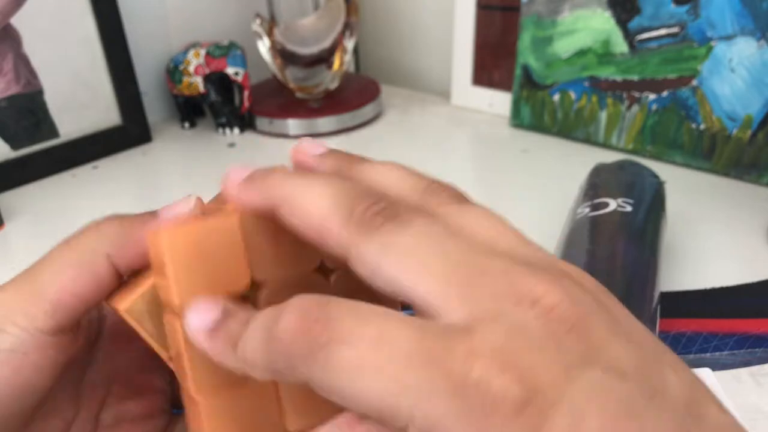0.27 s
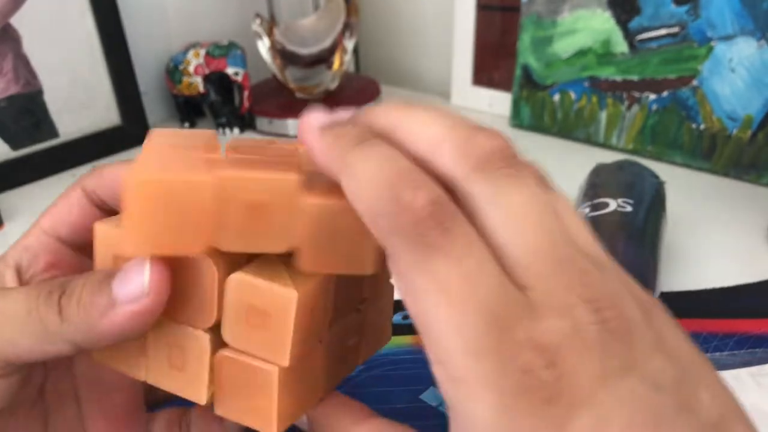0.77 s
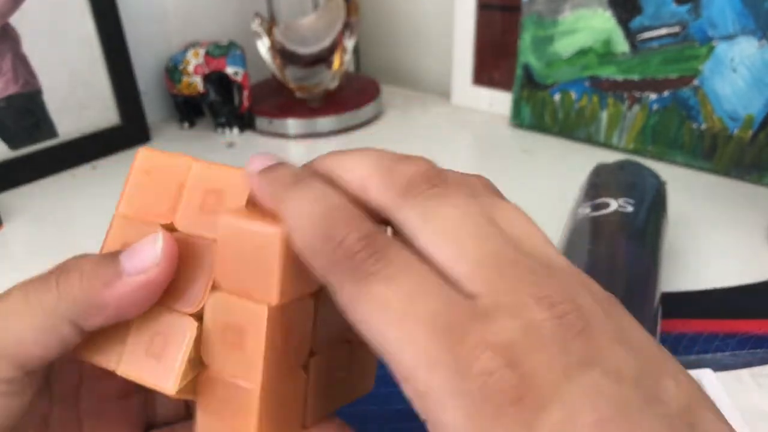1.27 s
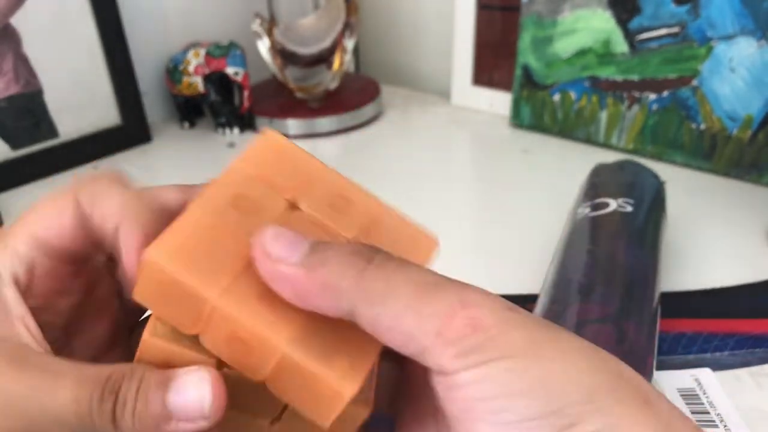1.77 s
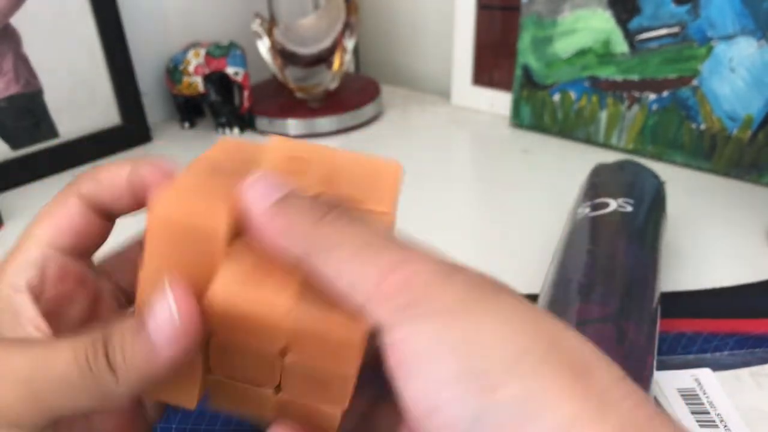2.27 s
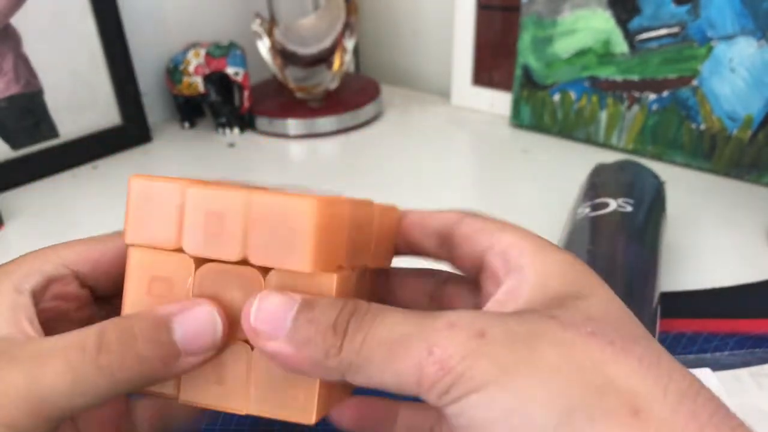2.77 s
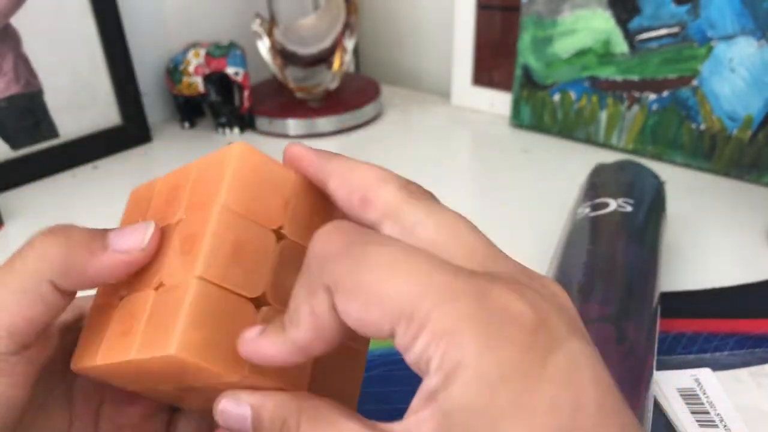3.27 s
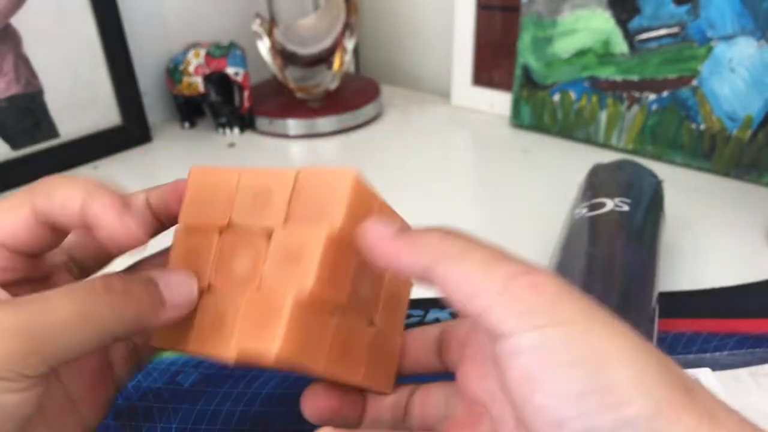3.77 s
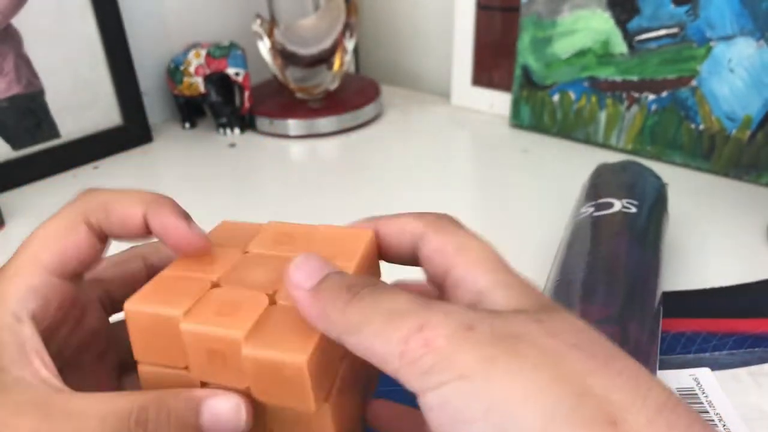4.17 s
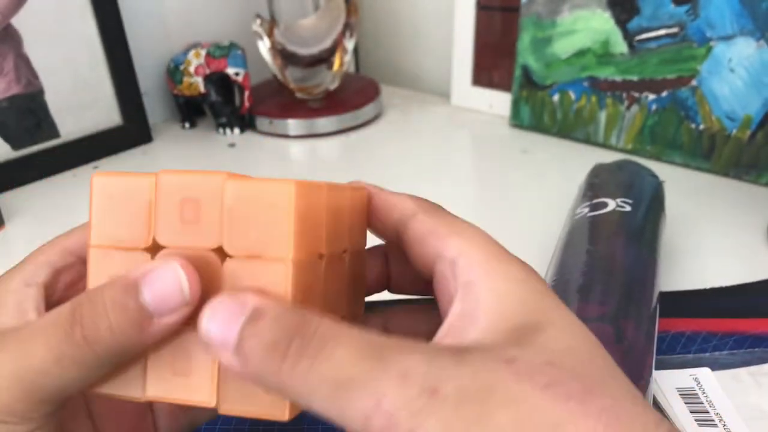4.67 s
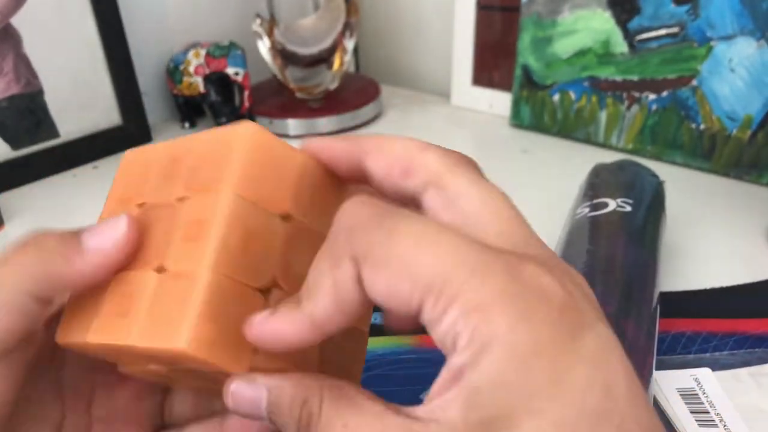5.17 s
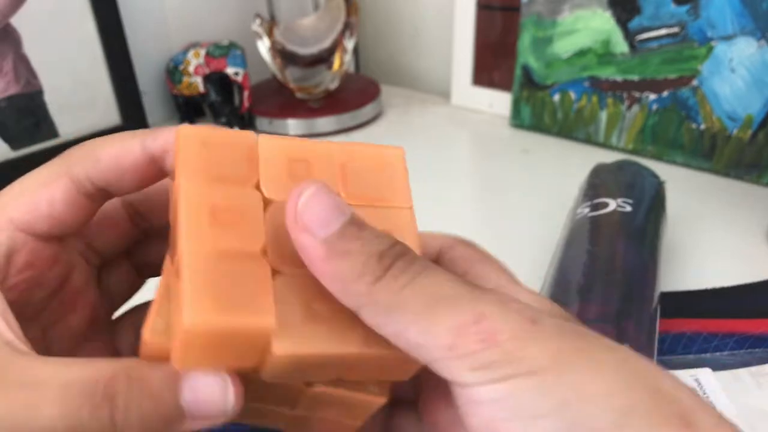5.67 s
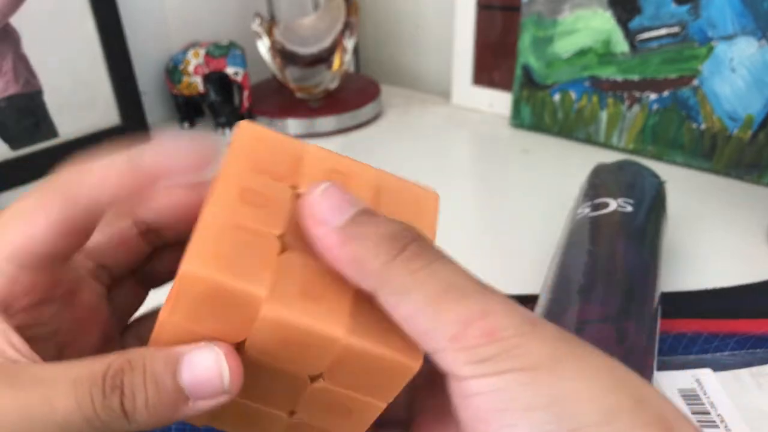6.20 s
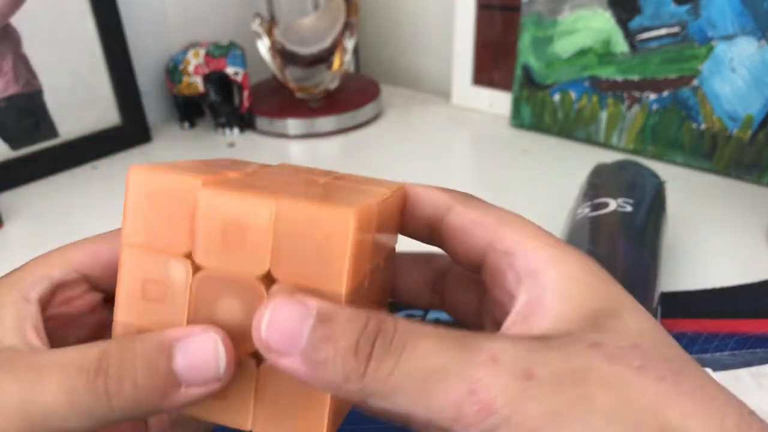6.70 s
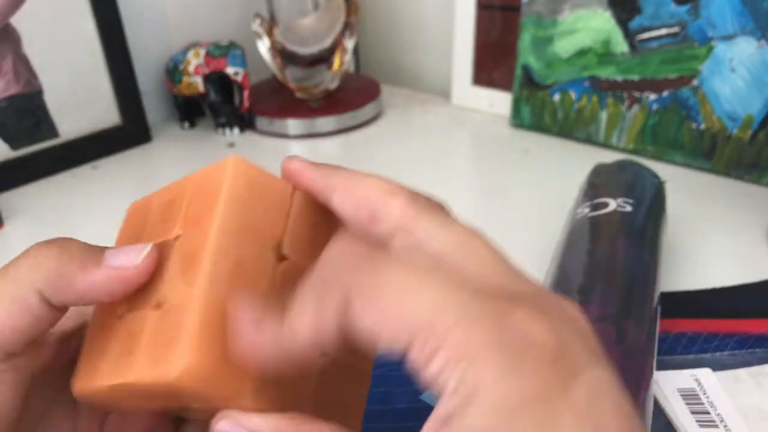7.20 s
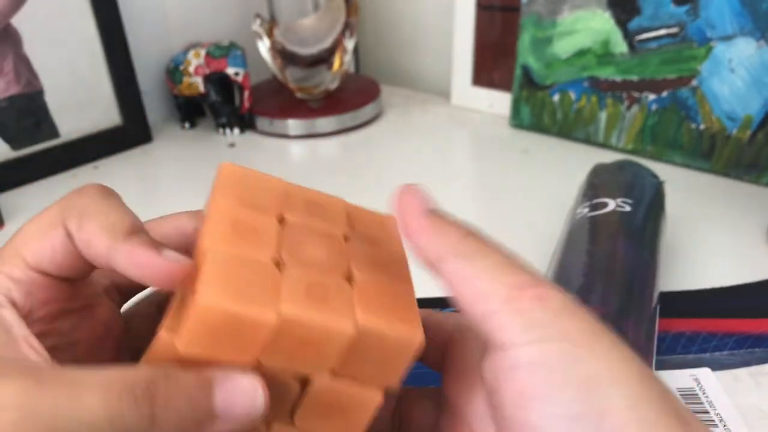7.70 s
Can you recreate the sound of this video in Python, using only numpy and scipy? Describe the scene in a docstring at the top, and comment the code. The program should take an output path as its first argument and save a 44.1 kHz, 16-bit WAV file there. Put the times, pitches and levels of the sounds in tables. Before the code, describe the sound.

A plastic twisting cube is worked in the fingers at uneven speed: light ticks, quick runs of bright clacks, short rubbing rattles as pieces slide, and occasional soft low bumps from the hands. Faint springy rings appear now and then. The sound is close and mostly dry, with a slight desk reflection and short small-room tail, over quiet air and a low unsteady hum.

```python
"""Turning a plastic speed cube

A speed cube is turned by hand close to a phone, above a desk in a small room.
Noise bursts make the clacks of layers catching; trains of tiny slips make the chatter of sliding pieces.
Damped sines give the faint core springs and the bumps of the hands.
A desk bounce and a short noise tail answer the cube, over soft air and a wavering low hum."""
import sys
import numpy as np
from scipy import signal
from scipy.fft import rfft, irfft
from scipy.io import wavfile

SR = 44100
rng = np.random.default_rng(int(sys.argv[2]) if len(sys.argv) > 2 else 0)


def dump(signal):
    """Clip the signal to [-1, 1] and save it as 16-bit WAV at the path in sys.argv[1]."""
    limited = np.clip(np.atleast_2d(signal).T, -1, 1)
    pcm = np.round(limited * 32767).astype(np.int16)
    wavfile.write(sys.argv[1], SR, pcm)


N = 350414
T = np.arange(N) / SR  # seconds

# Pieces striking each other, before the trim in clacks():
# (time [s], level over the first 3 ms [dB], hollow body [dB], hard edge [dB])
STRIKES = [(0.0738, -43, 10, 8), (0.0984, -38, 2, -1), (0.2338, -38.5, 10, -4), (0.279, -22.5, 0.5, 1),
           (0.3005, -24.5, 0.5, 1), (0.3853, -34.5, -6, -7), (0.423, -43, 0, -8), (0.463, -39, 2, -4),
           (0.6156, -35, -1, -8), (0.6683, -42, 4, -9), (0.6877, -32.0, -2, 0), (0.8606, -27.5, 0.5, 8),
           (0.878, -28.5, 0, 10), (0.8859, -27.5, -1.0, 0), (0.9948, -42.5, 10, 3.0),
           (1.0585, -40.0, -2, -2), (1.1811, -24.5, -3.5, -0.5), (1.3054, -32, 1.5, -5.0),
           (1.4207, -33.5, 12, 7), (1.4452, -24.0, 9, 2), (1.4743, -24, 2, -2), (1.49, -23.0, 6, -2),
           (1.5111, -26.5, 7.0, 4), (1.54, -25.5, -2.5, -0.5), (1.613, -36.5, 5, -5),
           (1.6658, -28.5, 5, 4.0), (1.7592, -41, 4.5, -2), (1.8381, -40.5, -1.5, -3), (1.986, -41, -2, 2),
           (2.0079, -29.5, 4, 4), (2.1542, -34.5, -12, 0), (2.3266, -32, 11, -6), (2.3404, -26, -9, 2.0),
           (2.3615, -23, -3, 1), (2.398, -21, 6, -2), (2.8632, -34, -6, -3), (2.888, -22.5, -3.5, -1.5),
           (2.9635, -33, 4.5, 0), (3.0366, -37, -4.0, -10.0), (3.068, -37.5, -3, 0), (3.126, -35.5, 2.0, 2),
           (3.1697, -27.5, 0, 1), (3.22, -33.5, 6, -10), (3.2642, -30, 4, -10), (3.3096, -37.5, -0.5, -5.0),
           (3.3916, -42, -4, -3), (3.4106, -27.5, 5, 1), (3.4447, -26, 1.0, 0), (3.4833, -19, -11.5, -5),
           (3.53, -32, 5.0, 5), (3.6, -31.5, -4.5, -3), (3.6728, -38.5, -4, -8), (3.7163, -17.5, -3, 9),
           (3.7294, -12, -5, 3.0), (3.7618, -22.5, 0, -4), (4.018, -44, -4.5, 2), (4.341, -38.0, 1, 0),
           (4.3724, -38, 5, 0), (4.5932, -32.5, -4, -1), (4.6048, -28.0, -5.0, -2.0), (4.6547, -33, 6, 0.0),
           (4.813, -40.5, 7, -6.0), (4.8523, -30.5, 2.5, 3), (5.008, -32, -5, -1), (5.0217, -31, 0.5, -3),
           (5.1666, -30.5, -9, -3), (5.207, -39, -6.0, -1), (5.2819, -34.5, 10, -1),
           (5.3375, -23.5, -1.5, 1.5), (5.3871, -30.0, 2.5, 0), (5.443, -32, 9.0, -3),
           (5.562, -49.5, 12, -1), (5.7193, -40, 2.5, -20), (5.925, -23, -1.5, 0), (6.027, -39, 9.5, 7.0),
           (6.2271, -37.5, 2.0, 2), (6.3077, -35.5, 10, 14), (6.335, -26.0, 0, -5), (6.3768, -29.0, 8, 1),
           (6.418, -34.5, 6.0, -4), (6.4866, -39.5, 3.5, -4), (6.8739, -31.5, 0.5, 8),
           (7.01, -41.5, -3, -2), (7.0339, -39.5, -17, -5.0), (7.0844, -30, 6, -1), (7.1971, -30, 2, -4),
           (7.2277, -30.5, 7.5, -1), (7.3678, -24.5, 2.5, 3.0), (7.4291, -31, 2, -2.0),
           (7.6298, -37.5, 3, 6.0), (7.6592, -15, -4, 4.0), (7.8288, -31.5, 7.5, -2), (7.864, -37, 6, 0.0),
           (7.8926, -22, -4.5, -14)]


def undb(db):
    """Decibels to gain."""
    return 10 ** (np.asarray(db) / 20)


def unit(x):
    """Scale to rms 1."""
    return x / np.sqrt(np.mean(x ** 2))


def fade(t, t60):
    """Exponential decay, 60 dB down after t60 seconds."""
    return np.exp(-np.log(1000) * t / t60)


def add(out, s, sound):
    """Mix a sound in at time s [s], cut off at the end of the scene."""
    i = max(0, int(s * SR))
    out[i:i + len(sound)] += sound[:max(0, N - i)]


def colour(x, points, size=2048):
    """Minimum-phase filter through (frequency [Hz], level [dB]) points, with unit power gain."""
    hz, db = np.transpose(points)
    bins = np.maximum(np.fft.rfftfreq(size, 1 / SR), 1)
    gain = undb(np.interp(np.log(bins), np.log(hz), db))
    # folding the cepstrum forward puts all of the response after the input
    cepstrum = irfft(np.log(gain))
    cepstrum[1:size // 2] *= 2
    cepstrum[size // 2 + 1:] = 0
    response = irfft(np.exp(rfft(cepstrum)))
    return signal.fftconvolve(x, response / np.linalg.norm(response))[:len(x)]


def clack(body_db, edge_db, rise_s=0.00018, snap_t60=0.0035, rebound_s=.0009, rebound_db=-5,
          ring_t60=0.044, ring_db=-13, hollow_ring=0.24, body_hz=3400, edge_hz=9500, size=2048):
    """One contact: a snap, a rebound about a millisecond later, and the dense rattle of the neighbours."""
    # Colour of a struck piece, before body and edge: (frequency [Hz], relative level [dB])
    plastic = [(120, -22), (280, -13), (420, -11), (750, -9.5), (1100, -4.5), (1600, -3), (2400, 2),
               (3400, 1), (4600, -1), (6600, 2.5), (8700, -0.5), (10500, -8.5), (12800, -6.5), (16000, -17)]
    t = T[:size]
    snap, rebound, ring = rng.standard_normal((3, size))
    late = t - rebound_s * (.5 + rng.random())
    rebound = undb(rebound_db) * rebound * fade(np.abs(late), snap_t60) * (late > 0)
    rattle = undb(ring_db) * ring * fade(t, ring_t60)
    # flat faces meeting sound hollow and shake their neighbours more
    blow = snap * fade(t, snap_t60) + undb(hollow_ring * body_db) * (rebound + rattle)
    # body lifts the lows and mids, edge lifts the top
    shape = []
    for hz, db in plastic:
        body = body_db / (1 + (hz / body_hz) ** 4)
        edge = edge_db / (1 + (edge_hz / hz) ** 8)
        shape.append((hz, db + body + edge))
    sound = colour(blow * (1 - np.exp(-t / rise_s)), shape, size=512)
    return sound / np.sqrt(np.mean(sound[:128] ** 2))  # rms 1 over the first 3 ms


def clacks(gain_db=0.33, catch_s=.0045, catch_db=-14, settle_s=.006, settle_db=-12, spread_db=2):
    """Every stop of a layer: a corner catches, the layer seats, and a neighbouring piece settles just after."""
    out = np.zeros(N)
    for s, db, body_db, edge_db in STRIKES:
        early, late = .5 + rng.random(2)
        light_db, loose_db = spread_db * rng.uniform(-1.2, 1, 2)
        contacts = ((-catch_s * early, catch_db + light_db),
                    (0, gain_db),
                    (settle_s * late, settle_db + loose_db))
        for delay, force_db in contacts:
            add(out, s + delay, undb(db + force_db) * clack(body_db, edge_db))
    return out


def turning(grip_db=-76, take_hold_db_per_s=479, ease_db=5.5, let_go_db_per_s=498):
    """Rubbing strength: builds as fingers take hold, eases on the way round, dies on release, over a steady grip."""
    # A layer pushed round or nudged into line: (start [s], length [s], rubbing level at the start [dB])
    turns = [(0.074, 0.035, -55), (0.228, 0.099, -45), (0.388, 0.07, -50.0), (0.612, 0.084, -49),
             (0.78, 0.13, -54), (1.052, 0.0083, -53), (1.303, 0.008, -41), (1.441, 0.084, -35),
             (1.567, 0.114, -44.5), (1.748, 0.097, -58), (1.973, 0.024, -51), (2.178, 0.018, -44),
             (2.328, 0.11, -35.5), (2.575, 0.1, -60), (2.849, 0.12, -44), (3.073, 0.12, -48),
             (3.234, 0.066, -43.5), (3.426, 0.15, -44), (3.755, 0.008, -30.0), (3.915, 0.12, -58),
             (4.138, 0.008, -49), (4.479, 0.036, -49), (4.597, 0.096, -45), (4.841, 0.074, -42),
             (5.018, 0.014, -33.5), (5.169, 0.013, -35), (5.311, 0.12, -40), (5.679, 0.04, -49),
             (5.874, 0.051, -52.5), (6, 0.15, -58), (6.287, 0.24, -44), (6.842, 0.086, -43.5),
             (7.008, 0.05, -59), (7.108, 0.035, -40), (7.225, 0.036, -36.5), (7.379, 0.13, -39.5),
             (7.656, 0.044, -35), (7.868, 0.062, -46)]
    power = np.full(N, undb(grip_db) ** 2)
    for s, length, db in turns:
        near = slice(max(0, int((s - .2) * SR)), int((s + length + .2) * SR))
        t = T[near] - s
        drop_db = take_hold_db_per_s * np.maximum(-t, 0)
        drop_db += ease_db * np.clip(t / length, 0, 1)
        drop_db += let_go_db_per_s * np.maximum(t - length, 0)
        power[near] += undb(db - drop_db) ** 2
    return np.sqrt(power)


def friction(wedge_db=-19, wedge_s=0.0031, freed_db=-4, freed_s=.008):
    """Strength of the slide: pieces wedge just before each clack and run free for a moment after it."""
    power, freed = turning() ** 2, np.zeros(N)
    t = T[:1024]
    for s, db, _, _ in STRIKES:
        # reversed decay: the rub swells up to the clack
        add(power, s - t[-1], undb(db + wedge_db) ** 2 * np.exp(-t[::-1] / wedge_s))
        add(freed, s, np.exp(-t / freed_s))
    return np.sqrt(power) * undb(freed_db * freed)


def sliding(slips_per_s=600, scatter_db=4.0, slip_t60=0.0099, smooth_db=-10, gain_db=-1.5):
    """Stick and slip: tiny uneven contacts on many pieces, each with its own short ring, over a smooth rub."""
    # Colour of pieces rubbing: (frequency [Hz], relative level [dB])
    rubbing = [(150, -27.5), (400, -0.5), (1200, -3.5), (2400, 0), (4600, -2.5), (6800, 0), (9000, -0.5),
               (10500, -9), (13000, -5), (16000, -12)]
    t, pieces, variety_db = T[:512], 20, 4
    chatter = np.zeros(N)
    for _ in range(pieces):
        slips = rng.random(N) < slips_per_s / pieces / SR
        force = undb(scatter_db * np.minimum(rng.exponential(size=N), 3.5))
        own_colour = [(hz, variety_db * rng.standard_normal()) for hz, _ in rubbing]
        ring = colour(rng.standard_normal(len(t)) * fade(t, slip_t60), own_colour, size=512)
        chatter += signal.oaconvolve(slips * force, unit(ring))[:N]
    smooth = undb(smooth_db) * rng.standard_normal(N)
    rub = colour(unit(chatter) + smooth, rubbing)
    return unit(rub) * undb(gain_db) * friction()


def snags(above_db=4.5, spread_db=3, colour_db=5.0, count=330):
    """Corners tick past each other at chance moments, as hard as the layer is being pushed."""
    out, push = np.zeros(N), turning()
    # one chance moment in each equal slot of time
    places = ((np.arange(count) + rng.random(count)) * (N - 1) / count).astype(int)
    chance = np.clip(rng.standard_normal((count, 3)), -2, 2)
    for i, (force, body, edge) in zip(places, chance):
        level = push[i] * undb(above_db + spread_db * force)
        add(out, T[i], level * clack(colour_db * body, colour_db * edge))
    return out


def loose_pieces(per_s=5, level_db=-57, spread_db=3):
    """Faint lone ticks of pieces shifting under the fingers, at random intervals."""
    out = np.zeros(N)
    chance = spread_db * rng.standard_normal((120, 3))  # ticks past the end are not heard
    times = np.cumsum(rng.exponential(size=len(chance))) / per_s
    for s, (force_db, body_db, edge_db) in zip(times, chance):
        add(out, s, undb(level_db + force_db) * clack(2 * body_db, edge_db))
    return out


def shell(x, t60=0.038, ring_db=-50):
    """The whole cube rings briefly after every contact: a bank of decaying cosines."""
    # Resonances of the assembled cube: (frequency [Hz], relative level [dB])
    modes = [(2083, 6.5), (2400, -3), (3060, 0.5), (3450, -7), (6630, -4), (6905, -6)]
    t = T[:4096]
    ring = sum(undb(db) * np.cos(2 * np.pi * hz * t) for hz, db in modes) * fade(t, t60)
    return x + undb(ring_db) * signal.oaconvolve(x, ring)[:N]


def pings(table, rise_s):
    """Damped sine tones with a soft onset."""
    out, t = np.zeros(N), T[:SR // 2]
    for s, hz, db, t60 in table:
        tone = np.sin(2 * np.pi * hz * t) * fade(t, t60)
        add(out, s, undb(db) * tone * (1 - np.exp(-t / rise_s)))
    return out


def springs():
    """Core springs ring faintly as a turn lets go."""
    # Spring tones, before the onset: (time [s], frequency [Hz], level [dB], t60 [s])
    spring_tones = [(.465, 3370, -64, .36), (.465, 4700, -68, .36), (.995, 1730, -59, 0.15),
                    (.995, 3483, -62, .25), (3.87, 3305, -63, .36), (3.87, 4560, -61, .36),
                    (6.087, 1860, -51, 0.1), (6.087, 2850, -51.5, .15), (6.087, 3984, -55, .12),
                    (6.087, 6100, -41, .07), (6.93, 5712, -56, .3)]
    return pings(spring_tones, rise_s=0.0026)


def bumps():
    """Fingers and palms bump the cube: short low tones with a rounded onset."""
    # Bump tones, before the onset: (time [s], frequency [Hz], level [dB], t60 [s])
    bump_tones = [(1.298, 117, -23.5, 0.076), (1.303, 318, -39, 0.067), (1.47, 285, -40, .075),
                  (3.73, 278, -42, 0.083), (4.34, 303, -35.5, 0.071), (6.41, 115, -31, 0.092),
                  (7.085, 295, -42.5, .075), (7.367, 305, -34, 0.063)]
    return pings(bump_tones, rise_s=0.0095)


TOP_HZ = 16000  # upper limit of the sound


def room(x, desk_s=.0036, desk_db=-18, near_db=-17, near_t60=0.034, tail_db=-17, tail_t60=0.2,
         treble_t60=0.2, split_hz=8000):
    """A bounce off the desk, a scatter from the things on it, and the short tail of the walls."""
    t = T[:SR // 2]
    near, far = rng.standard_normal((2, len(t)))
    near = near * fade(t, near_t60) * (t > desk_s)
    low_pass = signal.butter(2, min(split_hz, TOP_HZ), fs=SR, output="sos")
    low = signal.sosfilt(low_pass, far)
    tail = low * fade(t, tail_t60) + (far - low) * fade(t, treble_t60)
    tail = tail * (t > .011)  # the walls answer after 11 ms
    response = undb(near_db) * near / np.linalg.norm(near)
    response += undb(tail_db) * tail / np.linalg.norm(tail)
    response[int(desk_s * SR)] += undb(desk_db)
    return x + signal.oaconvolve(x, response)[:N]


def air(level_db=-56):
    """Soft room air: steady coloured noise."""
    # Colour of the room air: (frequency [Hz], relative level per Hz [dB])
    air_colour = [(22, -20), (45, 2), (85, 4), (130, 5.5), (190, -4.5), (300, -1.5), (430, -11.5),
                  (750, -18), (960, -6), (1200, -16), (1700, -15), (3000, -26.5), (7000, -30), (16000, -31)]
    return undb(level_db) * unit(colour(rng.standard_normal(N), air_colour, size=8192))


def hum(steady=0.61):
    """Low hum that wavers: a narrow noise band beats against a steady sine, under a slow swell."""
    # Hum bands: (frequency [Hz], offset where the noise is 12 dB down [Hz], level before the swell [dB])
    bands = [(57.9, 19, -48.5), (110.6, 14, -63)]
    # Slow swell of the hum: (time [s], gain [dB])
    swell = [(0, 3.5), (1.7, 1), (2.8, -0.5), (3.6, -3), (4.7, -0.5), (6, 0.5), (7.95, 0.5)]
    out, bins = np.zeros(N), np.fft.rfftfreq(N, 1 / SR)
    swell_db = np.interp(T, *np.transpose(swell))
    for hz, width, db in bands:
        resonance = 1 / (1 + ((bins - hz) / width) ** 2) ** 2
        waver = unit(irfft(rfft(rng.standard_normal(N)) * resonance, N))
        tone = steady * np.sqrt(2) * np.sin(2 * np.pi * hz * T)
        out += undb(db + swell_db) * unit(waver + tone)
    return out


def scene():
    """The cube in the hands, heard in the room."""
    contacts = clacks() + sliding() + snags() + loose_pieces()
    cube = shell(contacts) + springs() + bumps()
    return (room(cube) + air() + hum())[None]


def record(dry):
    """The phone drops the deepest rumble, rounds the loudest peaks and cuts the top."""
    ceiling, bottom_hz = .7, 36
    high_pass = signal.butter(4, bottom_hz, "high", fs=SR, output="sos")
    sound = signal.sosfilt(high_pass, dry)
    rounded = ceiling * np.tanh(sound / ceiling)
    low_pass = signal.ellip(10, .2, 80, TOP_HZ, fs=SR, output="sos")
    return signal.sosfilt(low_pass, rounded)


dry = scene()
out = record(dry)
dump(out)
```